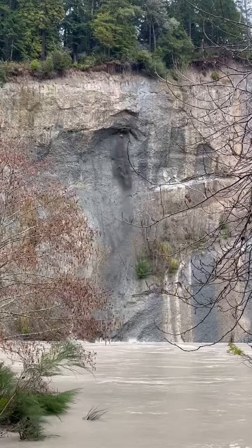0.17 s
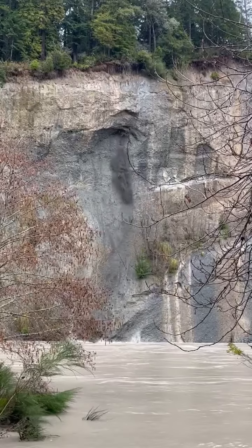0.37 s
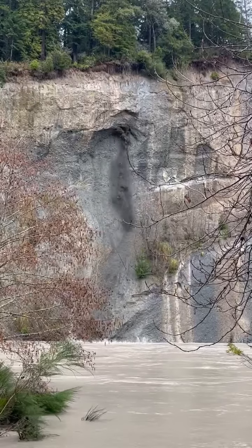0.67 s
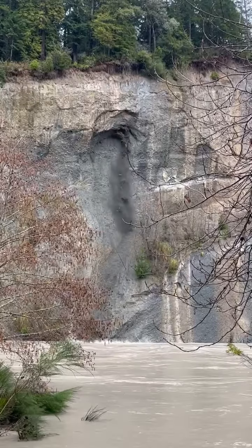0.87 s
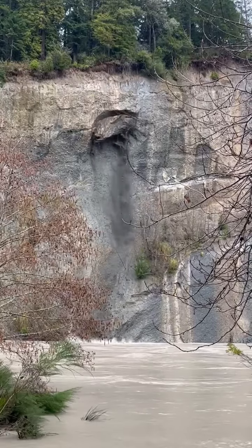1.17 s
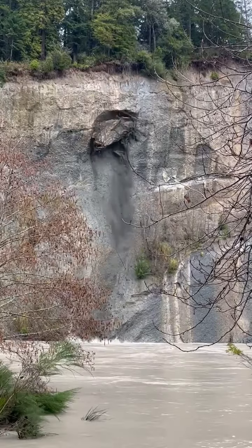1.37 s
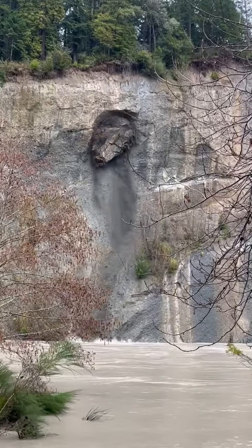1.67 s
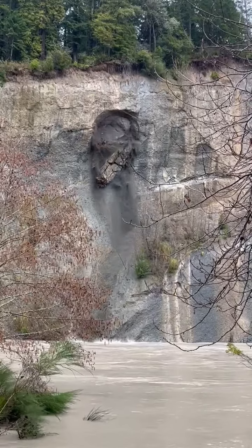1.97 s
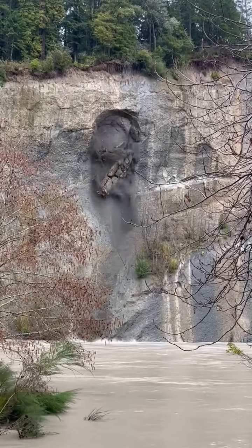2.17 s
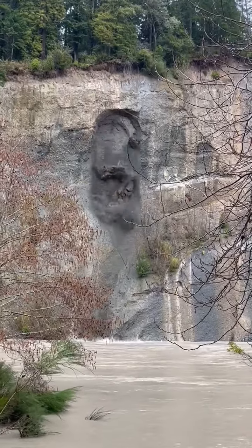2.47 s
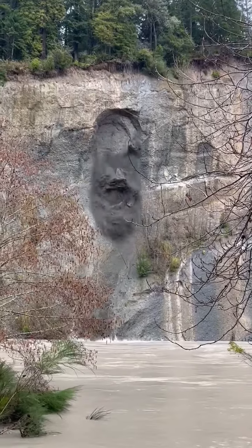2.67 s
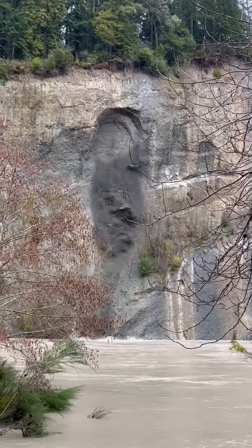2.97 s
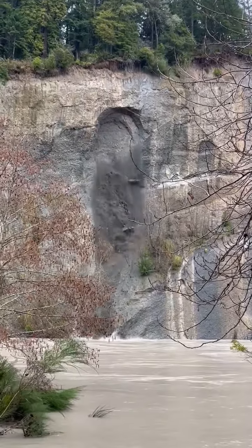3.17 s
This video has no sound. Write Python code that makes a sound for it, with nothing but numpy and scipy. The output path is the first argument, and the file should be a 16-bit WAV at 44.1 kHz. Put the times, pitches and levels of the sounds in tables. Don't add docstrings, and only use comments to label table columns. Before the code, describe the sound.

Earth and stones pour off a crumbling cliff into a rushing river, surging louder with thuds.

```python
import sys
import numpy as np
from scipy import signal
from scipy.io import wavfile
from scipy.ndimage import uniform_filter1d

SR = 44100
rng = np.random.default_rng(int(sys.argv[2]) if len(sys.argv) > 2 else 0)


def natural_amplitude(level_db):
    exponent = np.asarray(level_db, float) / 20
    return 10 ** exponent


def unload_wav(signal):
    wavfile.write(
        sys.argv[1],
        SR,
        np.round(np.clip(np.atleast_2d(signal).T, -1, 1) * 32767).astype(np.int16),
    )


N = 145971

# pitch_hz, level_db (per hertz)
RIVER_COLOUR = [(44, -30), (66, -6.5), (279, -1), (665, -5.5), (795, -3.5), (1410, -8), (5000, -17.5),
                (7000, -25.5), (9100, -50), (15400, -120)]
# pitch_hz, level_db (per hertz)
SPLASH_COLOUR = [(88, -56), (150, -6.5), (433, -6), (725, -7.5), (1470, -9), (1620, -7.5), (2800, -9),
                 (7000, -20), (9100, -36.5), (15400, -120)]
# pitch_hz, level_db (per hertz)
MIST_COLOUR = [(4000, -4), (6500, -1.5), (8500, 0.5), (11000, -4), (13000, -11), (14000, -14), (15200, -24)]
# pitch_hz, level_db (per hertz)
RUMBLE_COLOUR = [(18, -36), (30, -23), (48, -8), (87, -4.5), (109, -9.5), (200, -21), (260, -46),
                 (440, -120)]
# pitch_hz, level_db (per hertz)
CHURN_COLOUR = [(110, -3.5), (200, 6.5), (320, 2.5), (550, -2.5)]
# time_s, splash_level_db, spray_level_db
DEBRIS_SURGES = [(0, -45, -57), (.14, -44, -56), (.17, -41, -57), (.22, -39, -56), (.31, -39, -56),
                 (.42, -43.5, -57.5), (.96, -41.5, -56.5), (1.01, -35.5, -51.5), (1.21, -32, -49),
                 (1.45, -32.5, -50), (1.75, -34, -51.5), (2.18, -31, -51), (2.3, -27, -48),
                 (2.55, -27.5, -46.5), (2.9, -29.5, -48), (3.09, -24, -45.5), (3.16, -27.5, -46),
                 (3.31, -26, -42)]
# time_s, rumble_level_db, churn_level_db
SLIDE_SURGES = [(0, -50, -38), (.45, -61, -48), (.92, -49, -48), (1.06, -27.5, -38), (1.14, -42, -41),
                (1.4, -42, -36.5), (1.55, -46, -36), (1.75, -40, -44.5), (2.16, -46, -32.5),
                (2.27, -34.5, -28.5), (2.5, -31.5, -34.5), (2.8, -39.5, -35), (2.94, -29, -42.5),
                (3.02, -26.5, -44), (3.13, -31, -38.5), (3.31, -27, -33.5)]
# start_s, level_db (peak), pitch_hz
STONE_CRACKS = [(.0058, -26, 2600), (.0765, -25, 1350), (.1578, -22, 2200), (.1661, -21, 1300),
                (.1744, -19, 2800), (.1752, -23, 4000), (.286, -16, 1050), (.2992, -21, 2150),
                (.3027, -23, 2300), (.3465, -25, 2000), (.3542, -28, 1400), (.4323, -25, 2900),
                (.5055, -26, 4700), (.6025, -19, 3650), (.6113, -18, 3700), (.612, -25, 5000),
                (.7258, -19, 1950), (.772, -26, 5600), (.7738, -34, 10500), (.7748, -24, 4100),
                (.7736, -19, 3050), (.7742, -23, 5000), (.799, -24, 2300), (.8097, -23, 1050),
                (1.0294, -23, 1600), (1.0336, -21, 2300), (1.0974, -20, 2650), (1.156, -22, 3300),
                (1.188, -17, 1950), (1.205, -23, 4500), (1.2114, -17, 2650), (1.253, -21, 2100),
                (1.2687, -14, 3000), (1.2714, -18, 2200), (1.334, -21, 3200), (1.3683, -16, 1800),
                (1.4095, -18, 3100), (1.48, -22, 1400), (1.5859, -19, 2100), (1.8978, -20, 1450),
                (2.0234, -19, 2000), (2.0427, -17, 2600), (2.0474, -19, 2250), (2.2482, -17, 1850),
                (2.33, -19, 3100), (2.388, -19, 2900), (2.408, -19, 2800), (2.5331, -16, 2950),
                (2.539, -16, 2750), (2.608, -18, 2000), (2.65, -14, 2100), (2.7528, -18, 2100),
                (2.8513, -16, 2000), (2.9464, -17, 2450), (3.0778, -14, 3100), (3.2392, -16, 2400),
                (3.2493, -15, 1700), (3.2727, -16, 2300)]
# start_s, level_db (peak), pitch_hz
BLOCK_THUDS = [(0.025, -32, 101.0), (0.13, -34, 80.0), (0.353, -34, 94.0), (0.948, -32, 96.0),
               (1.027, -23.0, 112), (1.047, -28, 65), (1.074, -24.0, 94.0), (1.106, -29, 65.0),
               (1.184, -22.5, 72.0), (1.207, -26, 88.0), (1.239, -31.0, 78.0), (1.335, -29.0, 81.0),
               (1.382, -28.0, 101.0), (1.42, -31.0, 72.0), (1.482, -26, 79.0), (1.51, -33.0, 89.0),
               (1.571, -32, 75.0), (1.643, -31, 93.0), (1.661, -31, 77.0), (1.734, -36, 93.0),
               (1.766, -33, 106.0), (1.799, -32.0, 82.0), (1.856, -30.0, 86.0), (1.897, -35, 93.0),
               (1.918, -33.0, 81.0), (1.982, -32.0, 80.0), (2.027, -35.0, 100.0), (2.054, -33, 103.0),
               (2.193, -28, 83.0), (2.221, -29, 91.0), (2.258, -24.0, 59.0), (2.307, -25.0, 86.0),
               (2.326, -27, 86.0), (2.344, -27.0, 92.0), (2.417, -20, 84.0), (2.457, -21, 82.0),
               (2.537, -24.0, 69.0), (2.588, -24.5, 82.0), (2.63, -24.0, 90.0), (2.658, -28.0, 72.0),
               (2.675, -26.0, 88.0), (2.717, -28.0, 74.0), (2.738, -30, 87.0), (2.789, -28, 92.0),
               (2.815, -26, 92.0), (2.835, -26, 72.0), (2.865, -21.0, 75.0), (2.967, -19, 76.0),
               (2.995, -20, 72.0), (3.013, -17.0, 80.0), (3.051, -20, 86.0), (3.077, -19, 79.0),
               (3.094, -19.0, 78.0), (3.114, -14, 105.0), (3.136, -15.0, 78), (3.153, -20.0, 60.0),
               (3.177, -21.0, 78.0), (3.202, -19, 80.0), (3.259, -20.0, 94.0), (3.283, -22, 90)]
# pitch_hz, level_db, related_share (0-1), phase_rad
PORTS_LOW = [(150, -25.5, .15, 3.5), (408, -9, 0.84, .4), (694, -9.5, 0.2, -2), (955, -19, .05, 5),
             (1590, -1, 0.25, 1.5), (1770, -5.5, 1, 3), (2110, -2.5, 1, -5.5), (2630, -41, .2, 10)]
# pitch_hz, level_db, related_share (0-1), phase_rad
PORTS_HIGH = [(5520, -4, .6, -1.6), (6600, -3, .52, -1.56), (7900, 4.5, .4, -1.5), (8000, -12, .15, -1.5),
              (8600, -19, .05, -1.5), (9200, 1, .5, -1.5), (9850, -24, .1, -1.5), (13150, -5, .25, -1.5)]
# pitch_hz, width_hz, depth_db
PORT_NULLS = [(1632, 97, -2), (7750, 130, -22), (7440, 470, -2), (13300, 200, 0)]


def evened(x):
    return x / np.sqrt(np.mean(x ** 2) + 1e-20)


def read(points, hz, axis=1):
    p = np.array(points)
    return np.interp(np.log(hz + 1), np.log(p[:, 0] + 1), p[:, axis])


def surge(table, axis=1):
    p = np.array(table)
    return natural_amplitude(np.interp(np.arange(N) / SR, p[:, 0], p[:, axis]))


def add(mix, start_s, sound):
    part = mix[max(round(start_s * SR), 0):][:len(sound)]
    part += sound[:len(part)]


def wash(colour, patchy_db, flicker_db, size):
    frames, hz = 4 * N // size + 5, np.fft.rfftfreq(size, 1 / SR)
    a, b, c, d = rng.standard_normal((frames, len(hz), 4)).T
    patches = evened(uniform_filter1d(uniform_filter1d(c, size=8, axis=0), size=16, axis=1))
    flicker = evened(uniform_filter1d(uniform_filter1d(d, size=90, axis=0), size=3, axis=1))
    level_db = read(colour, hz)[:, None] + patchy_db * patches + flicker_db * flicker
    inside = (hz > .8 * colour[0][0]) * (hz < 1.1 * colour[-1][0])
    z = (a + 1j * b) * inside[:, None] * natural_amplitude(level_db)
    return evened(signal.istft(z, nperseg=size, noverlap=size - size // 4)[1][:N])


def river():
    return natural_amplitude(-33.5) * wash(RIVER_COLOUR, patchy_db=1.0, flicker_db=0.3, size=1024)


def gravel():
    grains_per_s, spread_db, cycles = 1500, 2.5, 2.2
    draw = rng.random((N, 3))
    size_db = spread_db * np.minimum(-np.log(draw[:, 0] + 1e-9), 5)
    size = natural_amplitude(size_db) * (draw[:, 1] < grains_per_s / SR)
    kind = (draw[:, 2] * 24).astype(int)
    out = np.zeros(N)
    for k, hz in enumerate(np.geomspace(815, 5540, num=24)):
        u = np.arange(400) / SR * hz / cycles
        grain = (-1) ** k * u * np.exp(-4 * u) * np.sin(2 * np.pi * cycles * u)
        grain = grain * natural_amplitude(read(SPLASH_COLOUR, hz)) * hz
        out += signal.oaconvolve(size * (kind == k), grain)[:N]
    return evened(out)


def pouring_debris():
    pour = wash(SPLASH_COLOUR, patchy_db=1.5, flicker_db=0.9, size=512) + natural_amplitude(-10.5) * gravel()
    mist = natural_amplitude(3.5) * wash(MIST_COLOUR, patchy_db=1.0, flicker_db=0.8, size=256)
    return surge(DEBRIS_SURGES) * pour + surge(DEBRIS_SURGES, axis=2) * mist


def sliding_mass():
    rumble = wash(RUMBLE_COLOUR, patchy_db=0, flicker_db=0, size=2048)
    rumble = rumble / np.sqrt(uniform_filter1d(rumble ** 2, size=3500) + 0.092)
    churn = wash(CHURN_COLOUR, patchy_db=1.5, flicker_db=1.0, size=1024)
    return surge(SLIDE_SURGES) * rumble + surge(SLIDE_SURGES, axis=2) * churn


def stones():
    gain_db, ring_t60_s, echo_s, echo_db = 2.5, .0033, .0018, -7
    grit_db, grit_t60_s = -22, .05
    out, t = np.zeros(N), np.arange(3000) / SR
    for start_s, level_db, hz in STONE_CRACKS:
        attack = np.minimum(2 * t * hz, 1)
        hit = np.sin(2 * np.pi * hz * t) * natural_amplitude(-60 * t / ring_t60_s) * attack
        band = signal.butter(2, [.5 * hz, 1.4 * hz], "band", fs=SR, output="sos")
        grit = evened(signal.sosfilt(band, rng.standard_normal(len(t)) ** 3))
        grit = natural_amplitude(grit_db - 60 * t / grit_t60_s) * grit
        add(out, start_s, natural_amplitude(level_db + gain_db) * (hit + grit))
        add(out, start_s + echo_s, -natural_amplitude(level_db + gain_db + echo_db) * hit)
    return out


def thuds():
    gain_db, rise_s, t60_s, sag = -0.5, 0.0111, 0.088, 0.11
    out, t = np.zeros(N), np.arange(SR // 4) / SR
    swell = np.sin(np.pi / 2 * np.minimum(t / rise_s, 1)) ** 2
    shape = swell * natural_amplitude(-60 * np.maximum(t - rise_s, 0) / t60_s)
    bend = 1 + sag * (1 - t / 0.014).clip(-1, 1)
    for start_s, level_db, hz in BLOCK_THUDS:
        turns = np.cumsum(hz * bend) / SR
        body = np.sin(2 * np.pi * (turns + rng.random()))
        under = 0.56 * np.sin(2 * np.pi * 0.575 * turns)
        add(out, start_s, natural_amplitude(level_db + gain_db) * shape * (body + under))
    return out


def scene():
    return np.tile(river() + pouring_debris() + sliding_mass() + stones() + thuds(), (2, 1))


def port_difference(z, hz, patch):
    ports = PORTS_LOW + PORTS_HIGH
    level_db = read(ports, hz)[:, None]
    low = (hz > .8 * PORTS_LOW[0][0]) * (hz < 1.03 * PORTS_LOW[-1][0])
    high_parts = (hz < PORTS_HIGH[-2][0]) + (hz > .975 * PORTS_HIGH[-1][0])
    heard = low + (hz > .98 * PORTS_HIGH[0][0]) * high_parts
    share = np.clip(read(ports, hz, axis=2), 0, 1)[:, None]
    related = z * np.exp(1j * read(ports, hz, axis=3))[:, None]
    power = uniform_filter1d(uniform_filter1d(abs(z) ** 2, size=5, axis=0), size=3, axis=1)
    a, b = rng.standard_normal((2,) + z.shape)
    diffuse = np.sqrt(abs(power)) * (a + 1j * b) * 1.21
    side = heard[:, None] * natural_amplitude(level_db) * (share * related + np.sqrt(1 - share ** 2) * diffuse)
    top = hz[:, None] > PORTS_HIGH[-2][0]
    return side * (level_db - 11 * top + 4 * patch > -15.5)


def port_sum(z, hz, patch):
    drift = rng.standard_normal((z.shape[1], len(PORT_NULLS)))
    drift = evened(uniform_filter1d(drift, size=12, axis=0).T)
    depth = np.clip(1 + 2 * 0.46 * drift, .15, 2)
    null_db = np.zeros(z.shape)
    for (null_hz, width_hz, depth_db), d in zip(PORT_NULLS, depth):
        null_db += depth_db * np.exp(-((hz[:, None] - null_hz) / width_hz) ** 4) * d
    return z * natural_amplitude(null_db) * ((hz[:, None] < 14150) + (patch > .75))


def top_cut(x):
    return signal.sosfilt(signal.butter(12, 15060, fs=SR, output="sos"), x)


def record(dry):
    low_cut = signal.butter(4, 38, "high", fs=SR, output="sos")
    mono = signal.sosfilt(low_cut, dry.mean(0))
    hz, t, z = signal.stft(mono, SR, nperseg=1024, noverlap=768)
    patch = rng.standard_normal((len(hz) // 8 + 1, len(t) // 4 + 1))
    patch = np.repeat(np.repeat(patch, 8, axis=0), 4, axis=1)[:len(hz), :len(t)]
    side = port_difference(z, hz, patch)
    mid = port_sum(z, hz, patch)
    pair = signal.istft(np.array([mid + side, mid - side]), SR, nperseg=1024, noverlap=768)[1][:, :N]
    return top_cut(pair)


dry = scene()
out = record(dry)
unload_wav(out)
```